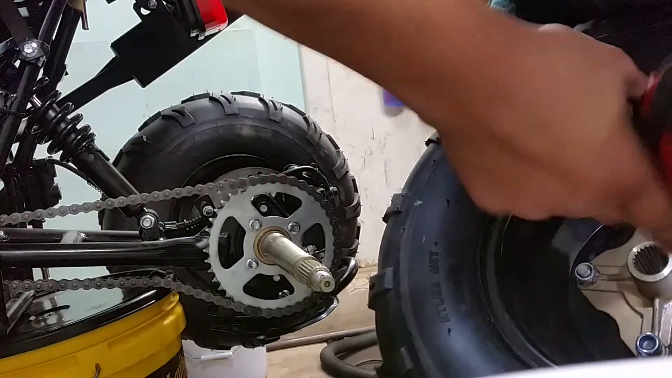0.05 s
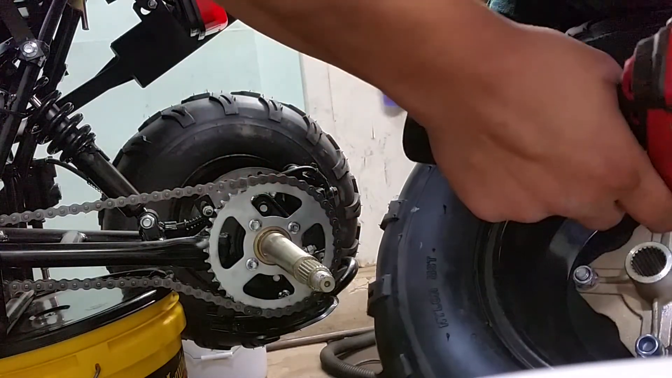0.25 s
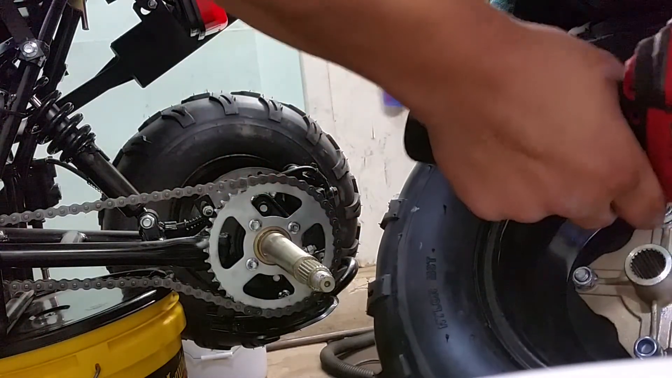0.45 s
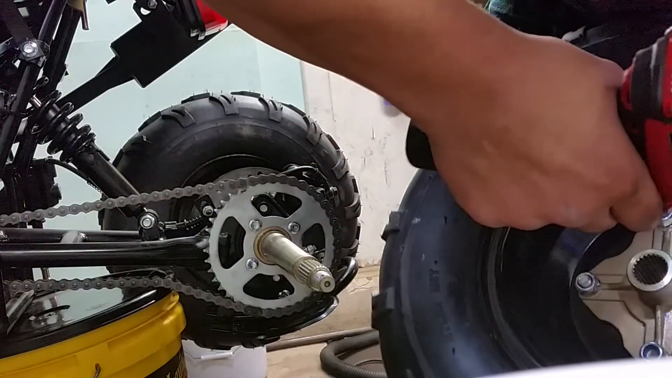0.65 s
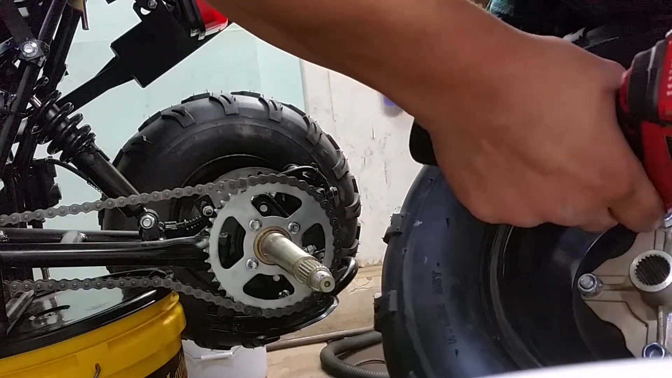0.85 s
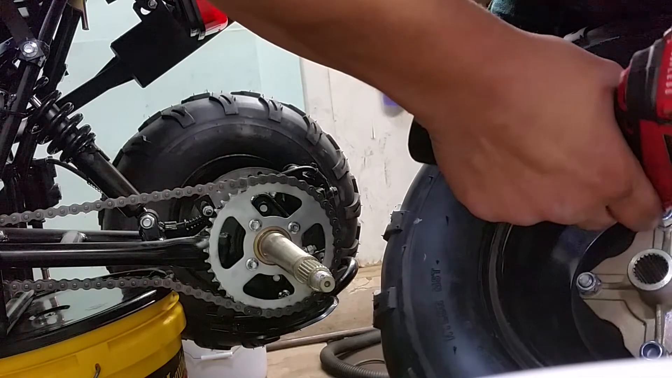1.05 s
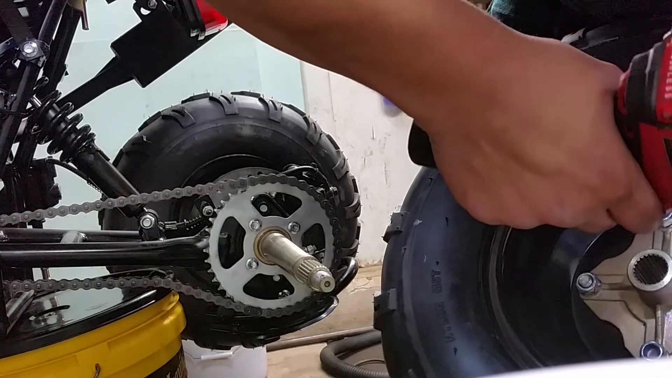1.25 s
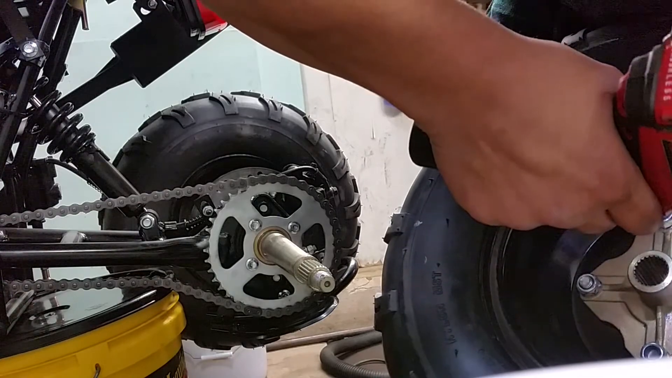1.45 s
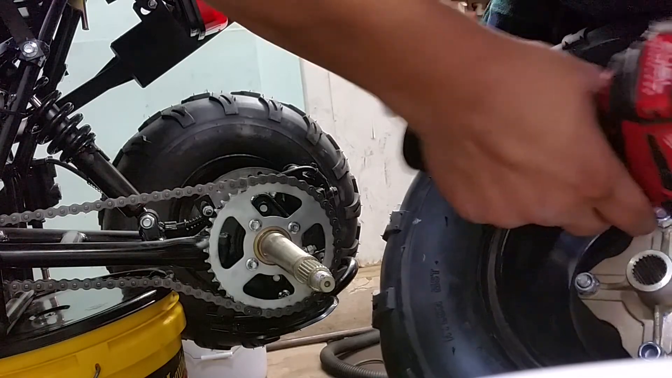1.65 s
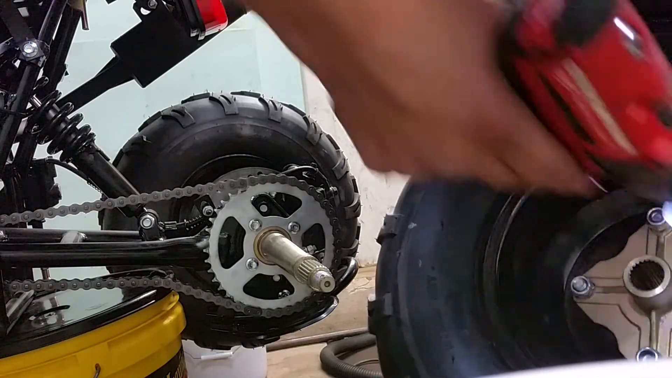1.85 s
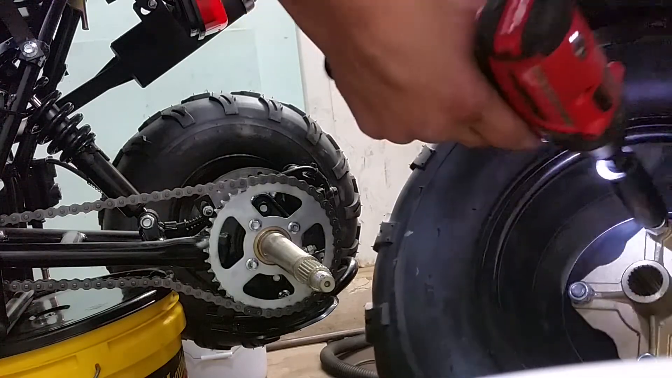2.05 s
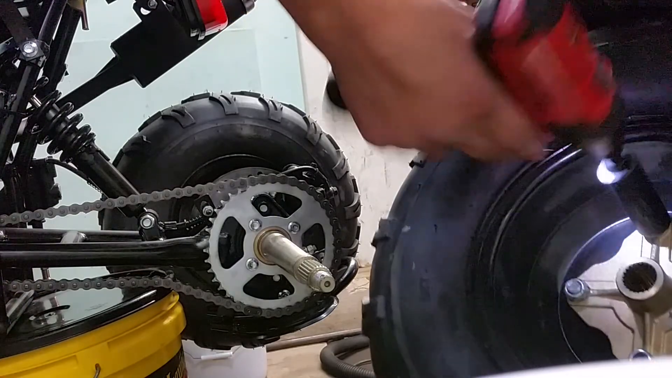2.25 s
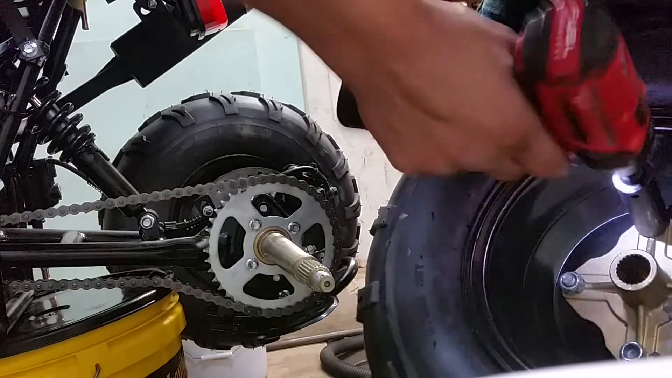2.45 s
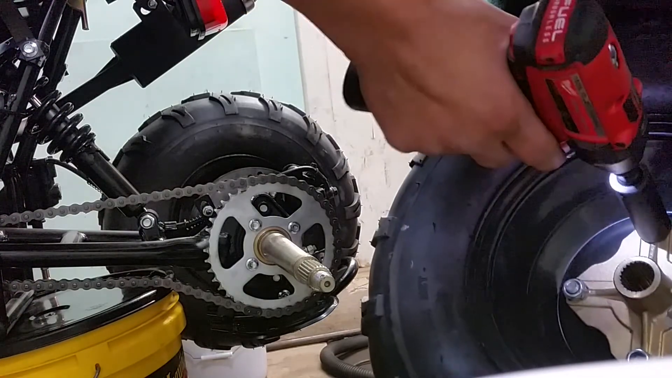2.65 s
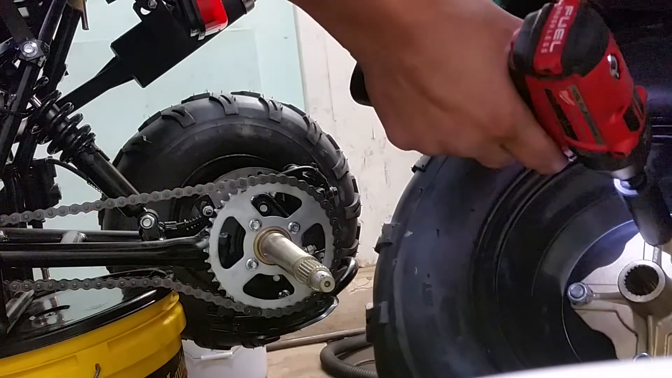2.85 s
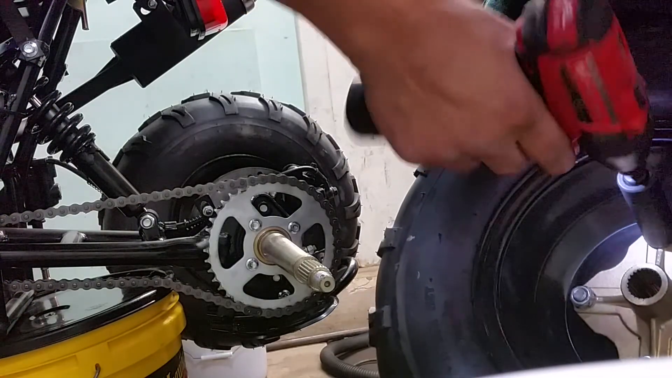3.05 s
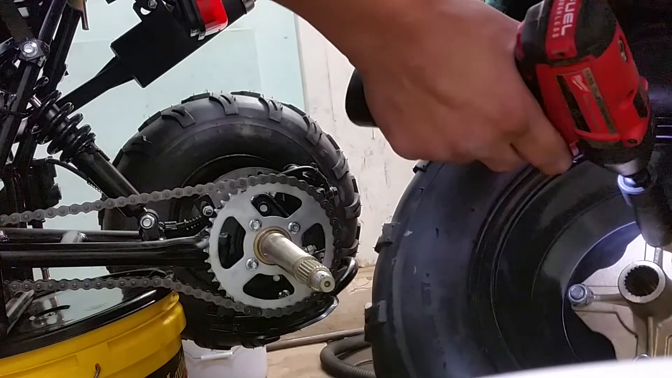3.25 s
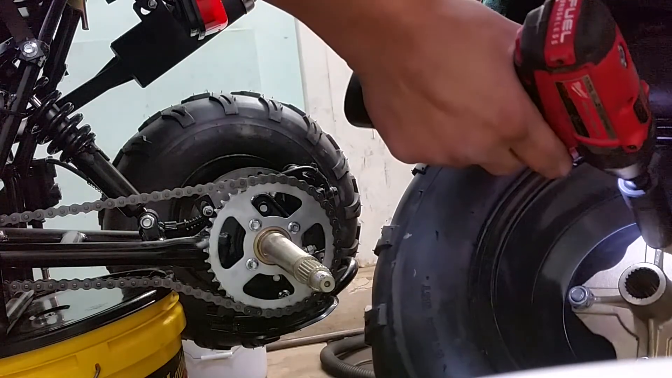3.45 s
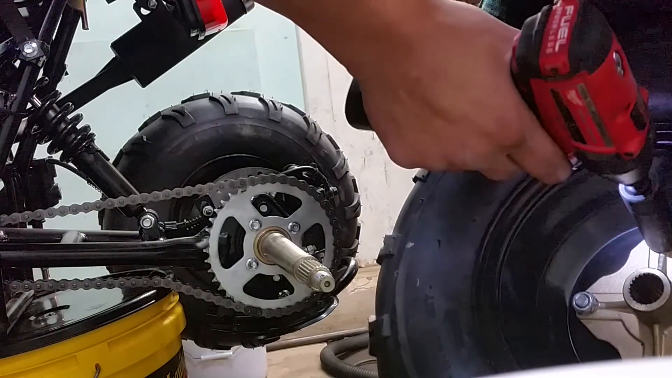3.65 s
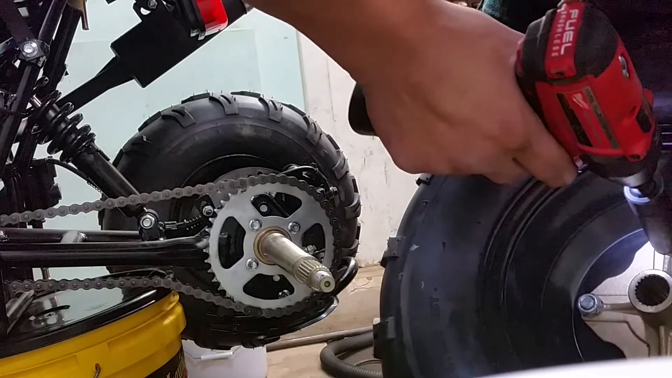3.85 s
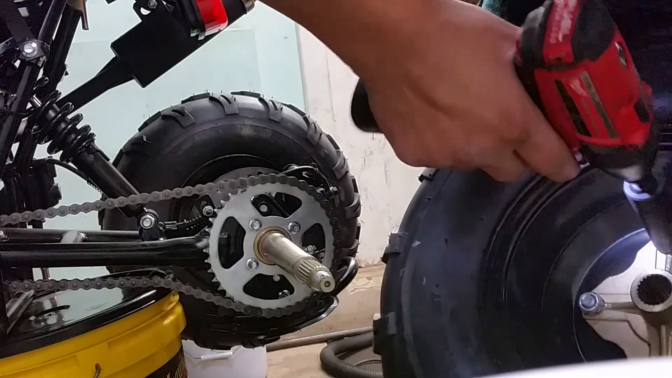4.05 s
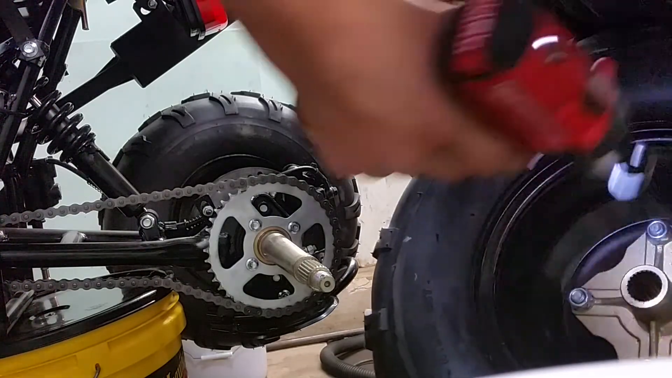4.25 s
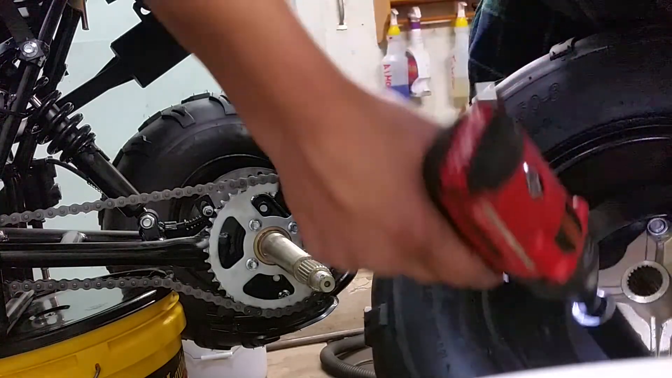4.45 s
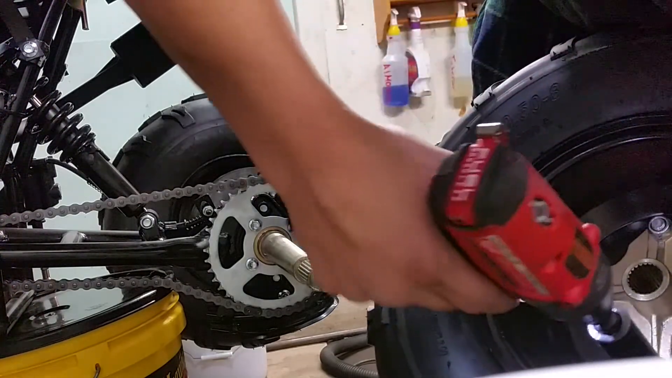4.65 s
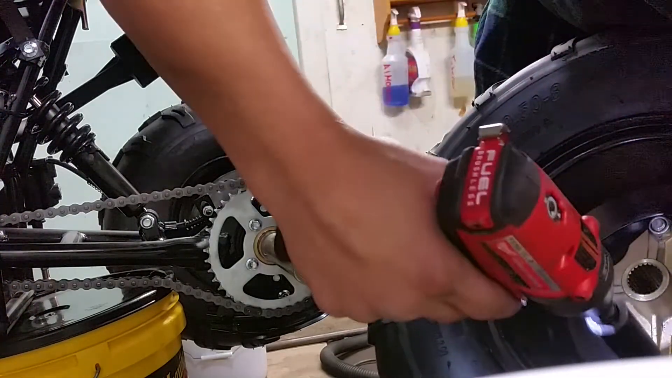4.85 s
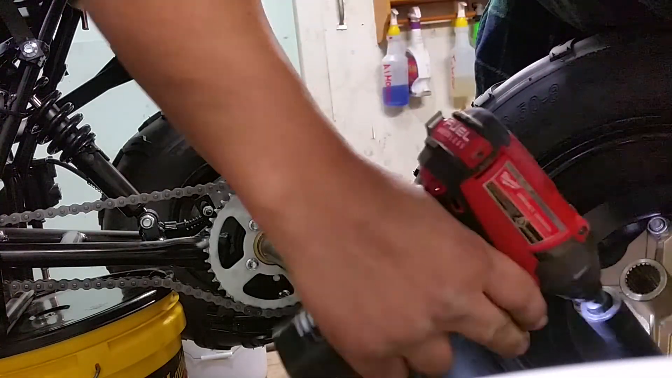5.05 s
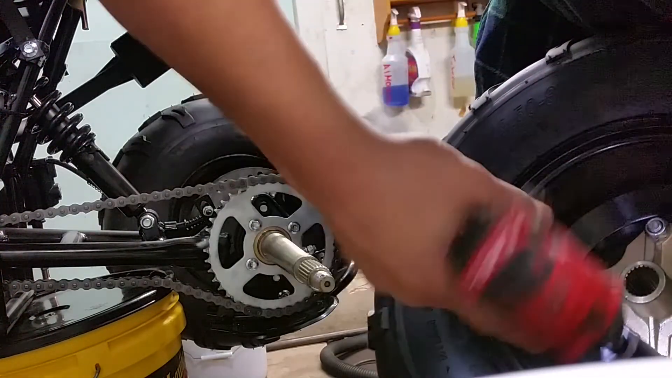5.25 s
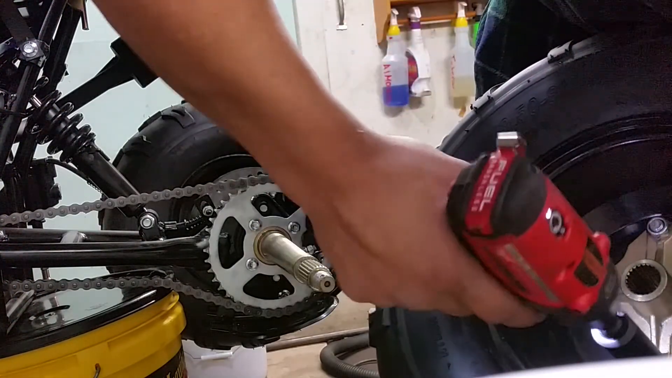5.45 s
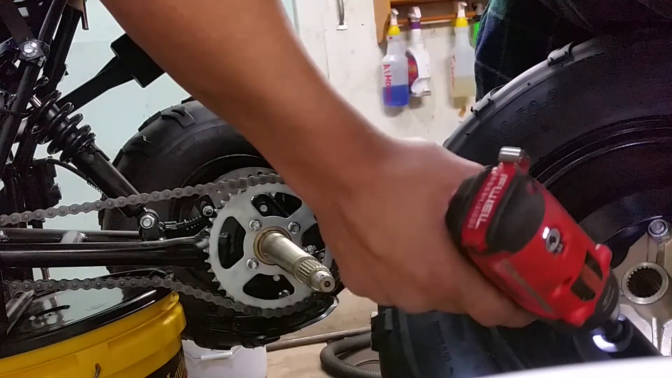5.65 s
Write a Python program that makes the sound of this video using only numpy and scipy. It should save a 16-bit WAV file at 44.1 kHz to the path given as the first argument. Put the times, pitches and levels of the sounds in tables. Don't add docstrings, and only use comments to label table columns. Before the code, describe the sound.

A phone close to a steel wheel catches three pulls of an impact wrench. Each begins with a high whine and loose rattle as the motor spins up, then harsh steel-on-steel blows speed up into a dense buzzing clatter. Between pulls, the room tail fades to soft hush while the socket clicks, knocks and slides from nut to nut. Stereo, with thumping microphone overload.

```python
import sys
import numpy as np
from scipy import signal
from scipy.fft import rfft, irfft, next_fast_len
from scipy.io import wavfile
from scipy.ndimage import uniform_filter1d

SR = 44100
rng = np.random.default_rng(int(sys.argv[2]) if len(sys.argv) > 2 else 0)


def transcribe(signal):
    frames = np.atleast_2d(signal).T
    limited = np.clip(frames, -1, 1)
    pcm = np.round(limited * 32767).astype(np.int16)
    wavfile.write(sys.argv[1], SR, pcm)


def linear_from_db(decibels):
    return 10 ** (np.asarray(decibels, float) / 20)


N = 252252
TIME = np.arange(N) / SR
FULL_HZ = 778

# pitch_hz, width_hz, level_db
RIM_MODES = [(314, 310, -3.5), (432, 89, 0), (561, 47, 4)]
# pitch_hz, width_hz, level_db
HUB_MODES = [(1210, 490, 0.5), (1502, 150, 0.5), (2264, 86, 7), (2730, 2450, -2.5)]
# pitch_hz, level_db (per Hz)
STEEL_COLOUR = [(900, -8), (1500, -4), (2250, -7.5), (4000, -7), (4800, -6.5), (5500, -3.5), (6000, -6.5),
                (6700, 3), (7840, 0.5), (9000, 3), (10300, 5.5), (12500, 3), (14500, 3.5), (16000, -3.5)]


def along(points, hz):
    f, v = np.transpose(points)
    return np.interp(np.log(hz + 1), np.log(f + 1), v)


def unit(x):
    return x / np.sqrt(np.mean(x ** 2) + 1e-20)


def filtered(x, response):
    m = next_fast_len(N + SR // 2)
    hz = np.fft.rfftfreq(m, 1 / SR)
    return irfft(rfft(x, m) * response(hz), m)[..., :N]


def ringing(x, modes):
    def response(f):
        total = 0
        for k, (pitch, width, db) in enumerate(modes):
            damping = 1j * f * width
            total = total + (-1) ** k * linear_from_db(db) * damping / (pitch * pitch - f * f + damping)
        return total
    return filtered(x, response)


def hiss(spectrum):
    return unit(filtered(rng.standard_normal((2, N)), lambda hz: linear_from_db(along(spectrum, hz))))


def near(alike):
    alike = np.clip(alike, 0, 1)
    shared = np.sqrt(alike) * rng.standard_normal(N)
    return shared + np.sqrt(1 - alike) * rng.standard_normal((2, N))


def bursts(times, gains, rise, t60):
    marks = np.zeros(np.shape(gains)[:-1] + (N,))
    marks[..., (np.asarray(times) * SR).astype(int)] = gains
    t = TIME[:SR // 20]
    shape = (1 - np.exp(-t / rise)) * linear_from_db(-60 * t / t60)
    shape = shape.reshape((1,) * (marks.ndim - 1) + (-1,))
    return signal.fftconvolve(marks, shape, axes=-1)[..., :N]


def strikes(times, gains, t60, rough, alike):
    return bursts(times, gains, rise=0.00011, t60=t60) * (1 + rough * near(alike))


def curve(spans, column, rest=-120):
    out = np.full(N, float(rest))
    for rows in spans:
        s, v = np.transpose(rows)[[0, column]]
        inside = (TIME >= s[0]) & (TIME <= s[-1])
        out[inside] = np.interp(TIME[inside], s, v)
    return out


def floor():
    # pitch_hz, level_db (per Hz)
    hush_colour = [(15, -30), (25, -31.5), (102, -6), (137, -6.5), (447, -9.5), (1680, -30.5), (2250, -28),
                   (4190, -31), (5950, -54), (6630, -17), (8910, -26), (15700, -15)]
    return linear_from_db(-51) * hiss(hush_colour)


def spin():
    # engage_s (gears), bite_s (hammer), rattle_db, air_db, whine_db
    pulls = [
        (0.027, 0.152, -22, -22.5, -42),
        (2.309, 2.46, -32.5, -32, -44),
        (5.252, 5.339, -20.5, -25, -27.5),
    ]
    lead_s, spin_up_s = .045, .085
    rise_s, fall_s = 0.012, 0.028
    chirp_db, wake_db = -27.5, 15
    slack_db, air_swell_db = 21, 2.5
    speed, spans = np.zeros(N), []
    for engage, bite, rattle_db, air_db, whine_db in pulls:
        since = TIME - engage + lead_s
        running = (since > 0) & (TIME < bite)
        speed += FULL_HZ * (1 - np.exp(-np.abs(since) / spin_up_s)) * running
        spans.append([(engage - lead_s, rattle_db - 2 * slack_db, air_db - slack_db, chirp_db - wake_db),
                      (engage, rattle_db - slack_db, air_db - 19, chirp_db),
                      (engage + rise_s, rattle_db, air_db - air_swell_db, whine_db),
                      ((engage + bite) / 2, rattle_db, air_db, whine_db),
                      (bite - fall_s, rattle_db - 5, air_db - air_swell_db / 2, whine_db),
                      (bite, rattle_db - slack_db, air_db - 32, whine_db - slack_db)])
    return speed, spans


def motor():
    # pitch_hz, width_hz, level_db
    gear_modes = [(3570, 90, 0)]
    # pitch_hz, width_hz, level_db
    case_modes = [(265, 170, 2.5), (559, 85, 7.5), (1270, 280, 1.5)]
    # pitch_hz, level_db (per Hz)
    air_colour = [(1500, -21), (2400, -7), (3300, -8.5), (4600, -14), (5960, -18.5), (6960, -12.5),
                  (8830, -13.5), (10400, 0), (12000, -14.5), (16000, -13)]
    switch_hz = 10150
    speed, spans = spin()
    winding = 2 * np.pi * np.cumsum(speed) / SR
    drift = np.cumsum(rng.standard_normal(N) * (0.027 + 0.37 * (speed / FULL_HZ) ** 3))
    carrier = np.sin(2 * np.pi * switch_hz * TIME + drift)
    tone = linear_from_db(-3 - 19 * (speed / FULL_HZ) ** 2) * 2 * np.cos(winding) * carrier
    gears = speed / 600 * unit(ringing(near(0.073), gear_modes))
    fizz = linear_from_db(-24) * hiss([(9300, -45), (10000, -11.5), (10900, -21)])
    whine = linear_from_db(curve(spans, column=3)) * (tone + gears + fizz)
    unevenness = unit(uniform_filter1d(rng.standard_normal(N), size=90))
    slack = near(1.0) * linear_from_db(4.3 * unevenness)
    rattle = linear_from_db(curve(spans, column=1)) * unit(ringing(slack, case_modes))
    air = linear_from_db(curve(spans, column=2)) * hiss(air_colour)
    return whine + rattle + air


def taps():
    # start_s, click_db, low_knock_db, high_knock_db
    contacts = [(0.024, -22, -50, -30), (1.5277, -53, -79, -37), (1.545, -13, -54, -44),
                (1.8688, -33.5, -37.5, -43), (1.9537, -37.5, -50.5, -43), (1.9779, -58, -45, -48),
                (2.007, -58, -66, -66), (2.0735, -43, -63, -68), (2.1662, -57, -39, -35),
                (2.1925, -65, -45, -36), (2.2067, -45, -63, -60), (2.3051, -24, -43, -39),
                (2.4198, -26, -58, -36), (2.436, -19, -41, -38.0), (4.2858, -28, -34, -31),
                (4.297, -45, -68, -53), (4.5372, -76, -55, -77), (4.5648, -38, -47.5, -37),
                (4.6944, -30, -45, -45), (4.7113, -62, -43, -70), (4.9781, -60, -44.5, -60),
                (4.995, -40, -47, -50.0), (5.0044, -45.5, -33, -44), (5.01, -40, -49, -59.0),
                (5.0659, -43, -45.5, -47), (5.1035, -31, -23.5, -16), (5.1697, -34, -47, -33),
                (5.1875, -52.0, -33, -27.5), (5.253, -19, -46, -38)]
    # pitch_hz, width_hz, level_db
    hub_ring = [(2313, 18, 5.5), (1446, 27, -4.5)]
    # start_s, level_db
    rub = [
        [(1.87, -57), (1.95, -60), (1.985, -56.5), (2.06, -69)],
        [(2.17, -40.5), (2.24, -67), (2.3, -65.5)],
        [(4.29, -46), (4.39, -58.5), (4.5, -91), (4.55, -75), (4.6, -59), (4.72, -67), (4.8, -70)],
        [(4.9, -73), (4.97, -59), (5.03, -47.5), (5.1, -55), (5.11, -24), (5.19, -38.5), (5.25, -53)],
    ]
    # pitch_hz, level_db (per Hz)
    slide_colour = [(60, -22), (200, -4), (550, -9), (900, -1), (1400, -8), (2350, -7), (3100, -10.5),
                    (8000, -21.5)]
    s, click_db, low_db, high_db = np.transpose(contacts)
    click = bursts(s, linear_from_db(click_db + 5.0), rise=0.00076, t60=0.028) * hiss(STEEL_COLOUR)
    low_push = strikes(s, linear_from_db(low_db + 34.5), t60=0.0018, rough=1.0, alike=0.78)
    high_push = strikes(s, linear_from_db(high_db + 28.5), t60=0.0017, rough=1.0, alike=0.89)
    ring_push = strikes(s, linear_from_db(high_db + 34), t60=0.0014, rough=0.49, alike=0.61)
    soft = filtered(ringing(low_push, RIM_MODES), lambda hz: 1 / (1 + 1j * hz / 900) ** 2)
    soft += filtered(ringing(high_push, HUB_MODES), lambda hz: 1 / (1 + 1j * hz / 3500) ** 2)
    soft += ringing(ring_push, hub_ring)
    unevenness = unit(uniform_filter1d(rng.standard_normal(N), size=200))
    grit = near(0.39) * linear_from_db(3.0 * unevenness)
    sliding = unit(filtered(grit, lambda hz: linear_from_db(along(slide_colour, hz))))
    return click + soft + linear_from_db(curve(rub, column=1)) * sliding


def blows():
    # start_s, blows_so_far (count)
    pace = [
        [(.1554, 0), (.1821, 1), (.31, 7), (.4344, 13), (.5332, 18), (.9971, 45), (1.4828, 73), (1.5067, 74)],
        [(2.4276, 0), (2.4953, 3), (2.8474, 20), (2.884, 22), (3.0205, 30), (3.3865, 51), (3.907, 81),
         (3.9289, 82), (3.9581, 83)],
        [(5.3358, 0), (5.358, 1), (5.4044, 3), (5.4674, 6), (5.5872, 12), (5.7051, 18)],
    ]
    # start_s, blow_db, grip_db, shake_db
    effort = [(.15, -12.5, -1, -3), (.4, -15.5, -1.3, -3), (.55, -17, 1.7, -5), (.8, -13.5, -1.5, 4),
              (1.0, -15.5, -1.1, -2.5), (1.4, -13.5, 1.5, 4), (1.52, -13, -10, -15), (2.4, -13.5, -1.5, 6),
              (2.7, -15.5, 1, 1), (2.9, -16, -1.5, 3), (3.05, -14, 1, 8), (3.5, -14, 2.5, 7.5),
              (3.9, -13.5, 0.5, 4.5), (3.97, -20, -16, 9), (5.33, -13, -3.5, -16), (5.5, -16, 3, -10),
              (5.72, -16, -3, -10)]
    lug_db = .9
    turns, times = [], []
    for rows in pace:
        count = np.arange(rows[-1][1] + 1)
        at, struck_so_far = np.transpose(rows)
        turns.append(count)
        times.append(np.interp(count, struck_so_far, at))
    s = np.concatenate(times)
    luck = rng.standard_normal((len(s), 4))
    at, *controls = np.transpose(effort)
    blow_db, grip_db, shake_db = [np.interp(s, at, c) for c in controls]
    crack_db = blow_db - lug_db * (-1) ** np.concatenate(turns) + 1.65 * luck[:, 0]
    knock_db = blow_db + grip_db - 9 + 2 * luck[:, 1]
    thump_db = blow_db + shake_db - 20 + 2.5 * np.minimum(luck[:, 2], 1)
    jitter_s = .0005
    return s + jitter_s * luck[:, 3], crack_db, knock_db, thump_db


def hammer(struck):
    # start_s, level_db, upper_over_lower_db
    seat = [
        [(.15, -60, 5), (.56, -46, 0.1), (.61, -35, 3), (.9, -43, 3.5), (1.25, -38, 3), (1.33, -41, 1),
         (1.6, -45, 3)],
        [(2.42, -59, -8), (2.9, -48, 6), (3.3, -41.5, -4), (4, -42, -6)],
        [(5.33, -65, -3), (5.72, -64, -3)],
    ]
    # pitch_hz, width_hz
    socket_modes = [(4405, 100), (5175, 90)]
    s, crack_db, knock_db, _ = struck
    crack_db, knock_db = np.minimum(crack_db, -12.5), np.minimum(knock_db, -20)
    late = s + .0015 + .002 * rng.random(len(s))
    both, both_db = np.append(s, late), np.append(crack_db, crack_db - 6.5)
    steel = hiss(STEEL_COLOUR)
    bright = filtered(steel, lambda hz: 1 / (1 + (8800 / (hz + 1)) ** 12))
    dull = filtered(steel, lambda hz: 1 / (1 + (hz / 5600) ** 12))
    body = steel - bright - dull
    crack = bursts(both, linear_from_db(both_db + 3.0), rise=0.00018, t60=0.028) * bright
    crack += bursts(both, linear_from_db(both_db - 0.5), rise=0.0014, t60=0.051) * body
    crack += bursts(s, linear_from_db(crack_db + 10.5), rise=0.00024, t60=0.024) * dull
    low_push = strikes(s, linear_from_db(knock_db + 22.0), t60=0.0015, rough=1.35, alike=0.34)
    high_push = strikes(s, linear_from_db(knock_db + 18.0), t60=0.0019, rough=1.75, alike=0.83)
    knock = ringing(low_push, RIM_MODES) + ringing(high_push, HUB_MODES)
    jab_gain = linear_from_db(crack_db + 76 + 3.1 * rng.standard_normal(len(s)))
    jab = strikes(late, jab_gain, t60=0.00086, rough=0.6, alike=0.28)
    ring = 0
    for k, (hz, width) in enumerate(socket_modes):
        ring_db = curve(seat, column=1) + k * curve(seat, column=2, rest=0)
        ring = ring + ringing(linear_from_db(ring_db) * jab, [(hz, width, 0)])
    return crack + knock + ring


def overload(struck):
    # start_s, level_db
    slams = [(0.155, -27), (0.205, -25), (0.2894, -21), (0.351, -25), (0.3715, -19.5), (0.3933, -34),
             (0.7234, -33), (0.7383, -20), (0.8087, -27), (1.116, -49), (1.274, -33), (1.4471, -19.5),
             (1.4657, -15.5), (2.4479, -19), (2.537, -20), (2.5544, -21), (2.7006, -23), (3.0389, -19),
             (3.1078, -23), (3.1776, -31), (3.2987, -18), (3.611, -24), (3.631, -22), (3.665, -20),
             (3.7328, -21), (3.7857, -15.5), (3.8724, -19.5), (3.9058, -18), (5.688, -27)]
    ordinary = [struck[0] + 2 / SR, struck[3]]
    s, thump_db = np.append(np.transpose(slams), ordinary, axis=1)
    luck = rng.standard_normal((len(s), 3))
    throw = luck[:, 1:] + 0.53 * luck[:, :1] + [0, 0.8]
    throw = np.sign(throw) * linear_from_db(thump_db[:, None] + [8, 15])
    push = bursts(s, throw.T, rise=0.0001, t60=0.0077)
    return ringing(push, [(138, 230, 0)])


def garage(x):
    # pitch_hz, t60_s (time to fall 60 dB)
    room_fade = [(100, 0.38), (700, 0.36), (1840, 0.47), (4850, 0.49), (12800, 0.45)]
    hz, t, z = signal.stft(rng.standard_normal((2, SR * 2 // 3)), SR, nperseg=256)
    alike = 0.93 / (1 + (hz[:, None] / 1200) ** 2)
    shared = z.sum(0) / np.sqrt(2)
    z = np.sqrt(np.clip(1 - alike, 0, 1)) * z + np.sqrt(alike) * shared
    fade = linear_from_db(-60 * t / along(room_fade, hz)[:, None])
    tail = signal.istft(z * fade, SR, nperseg=256)[1]
    delayed = np.pad(x, ((0, 0), (150, 0)))
    return signal.fftconvolve(delayed, tail / np.linalg.norm(tail[0]), axes=1)[:, :N]


def scene():
    struck = blows()
    tool = hammer(struck) + motor()
    small = taps()
    room = garage(linear_from_db(-3) * tool + linear_from_db(-6) * small)
    return tool + small + room + overload(struck) + floor()


def low_pass(x):
    return signal.sosfilt(signal.butter(12, 16640, fs=SR, output="sos"), x)


def record(dry):
    # pitch_hz, left_minus_right_db
    port_lean = [(200, -4), (450, -1.5), (1220, -1), (2010, -1.5), (3330, 0), (5000, -0.5), (6500, 5),
                 (8000, 7.5), (9500, -6), (12000, -6), (15000, -4)]
    top_hz = 15800

    def ports(hz):
        level = linear_from_db(along(port_lean, hz) * [[.5], [-.5]])
        delay = np.exp(-1j * np.pi * hz * [[6], [-6]] / SR)
        return level * delay * np.where(hz < top_hz, 1, linear_from_db(-46))

    rounded = dry / (1 + np.abs(dry / 1.1) ** 4) ** .25
    return low_pass(filtered(rounded, ports))


dry = scene()
out = record(dry)
transcribe(out)
```